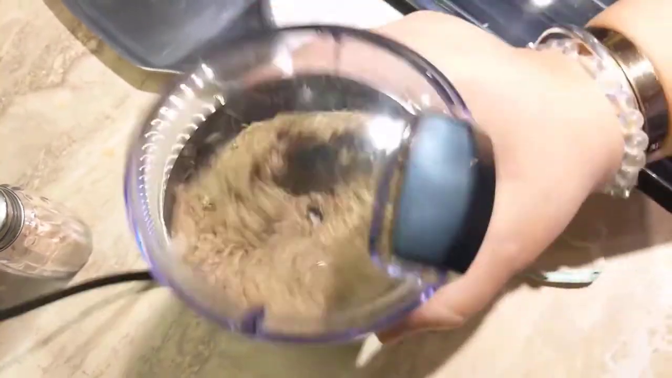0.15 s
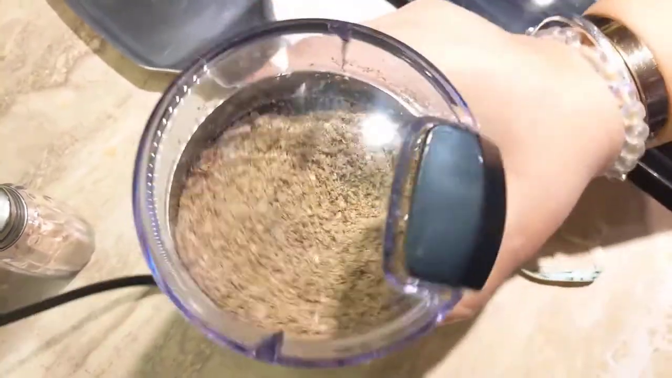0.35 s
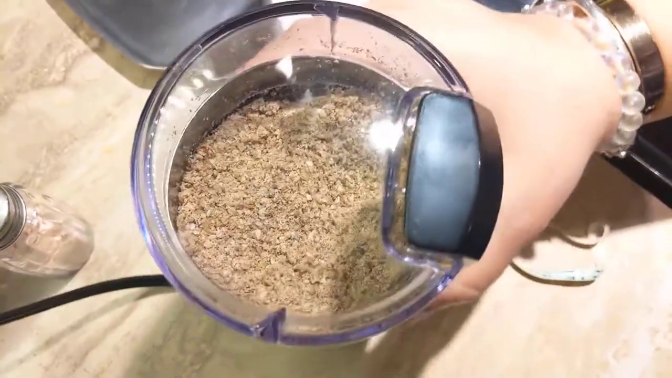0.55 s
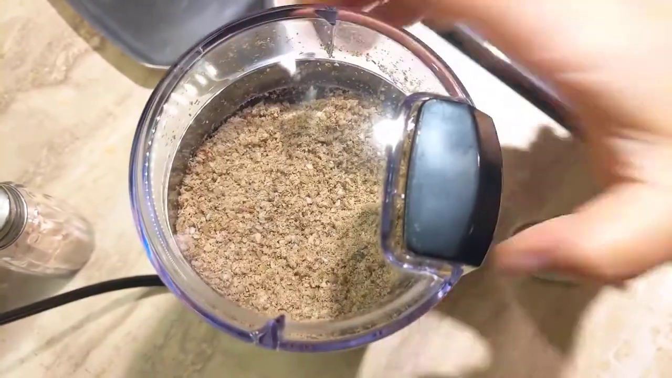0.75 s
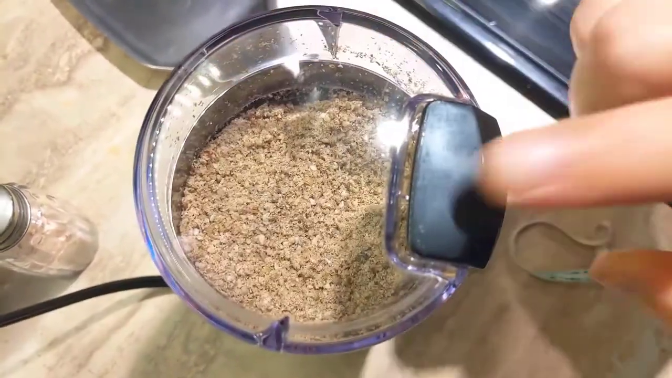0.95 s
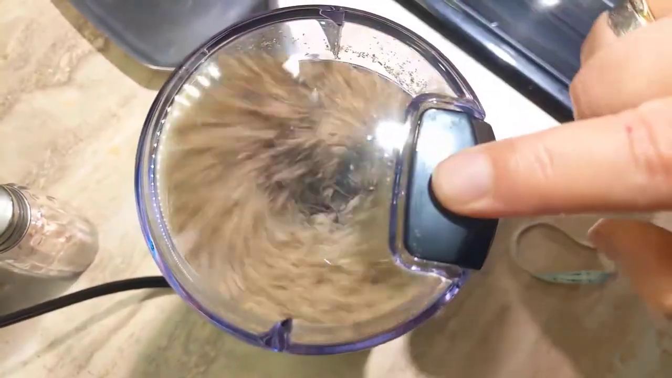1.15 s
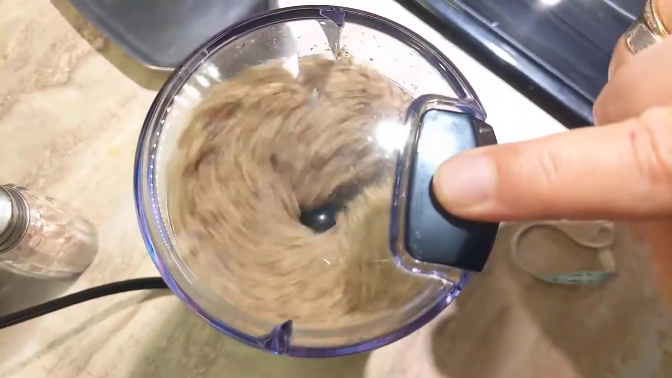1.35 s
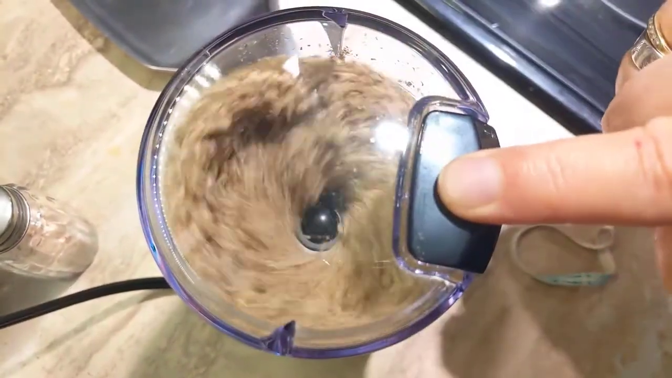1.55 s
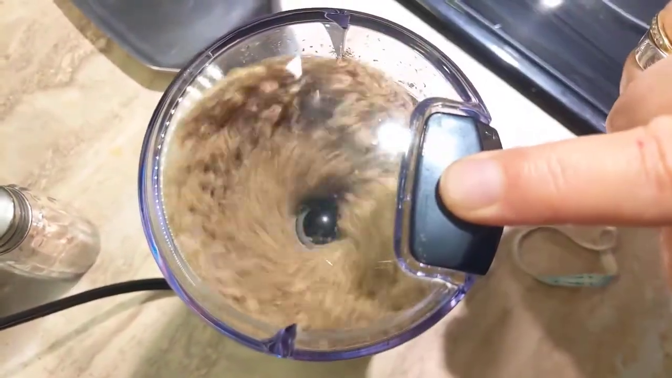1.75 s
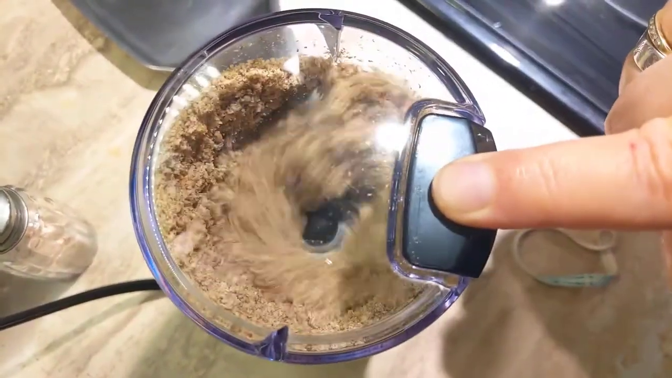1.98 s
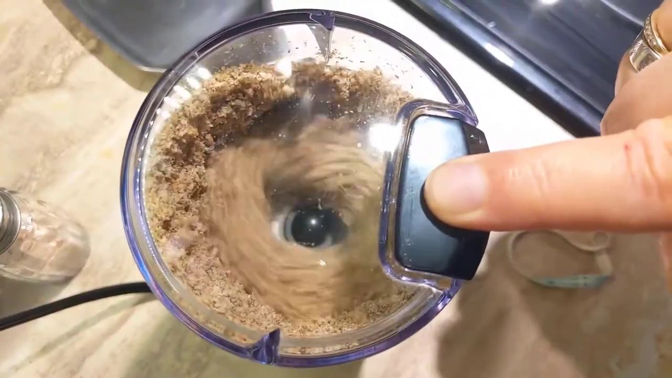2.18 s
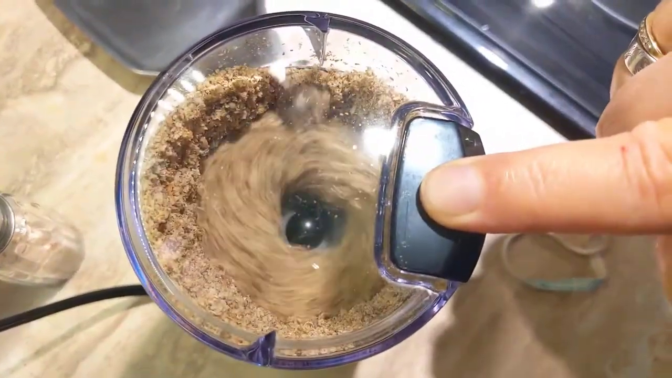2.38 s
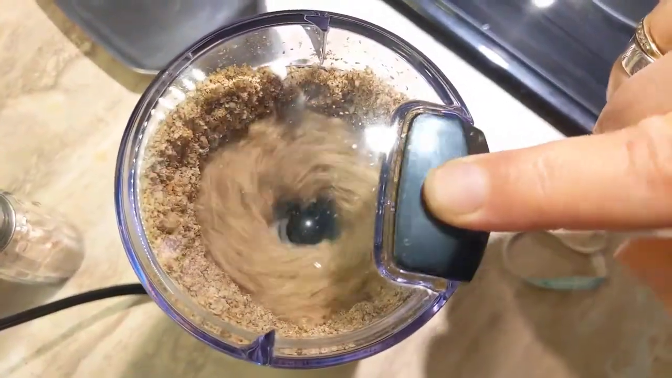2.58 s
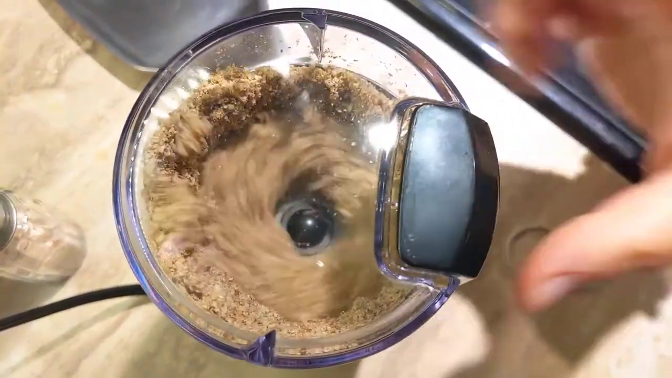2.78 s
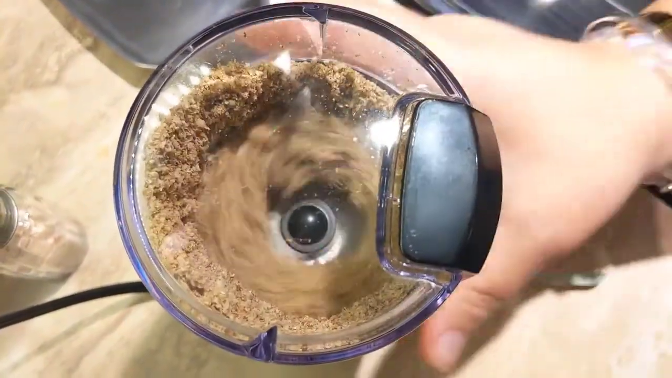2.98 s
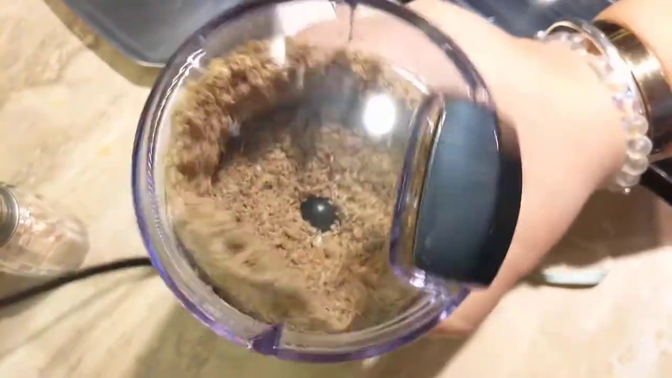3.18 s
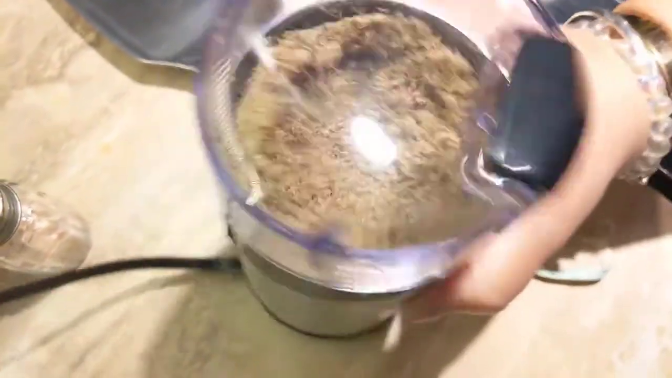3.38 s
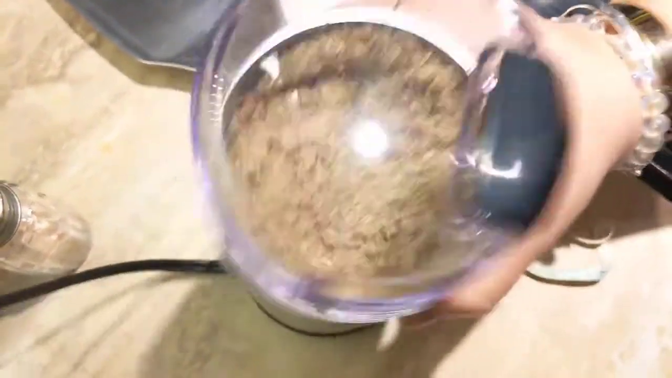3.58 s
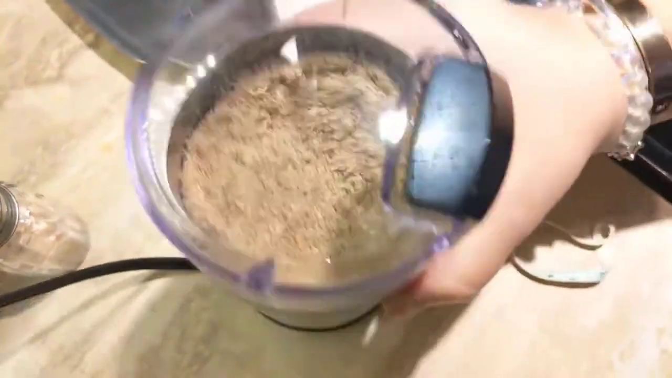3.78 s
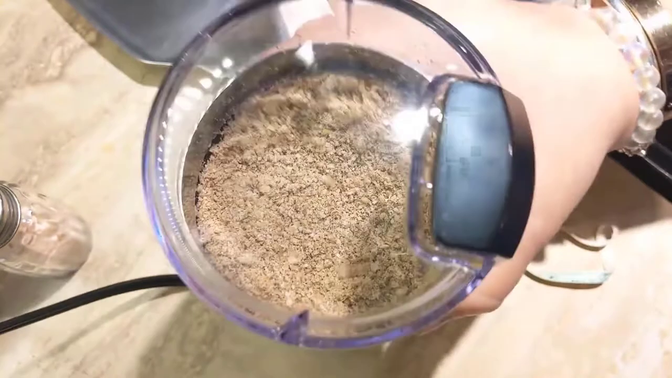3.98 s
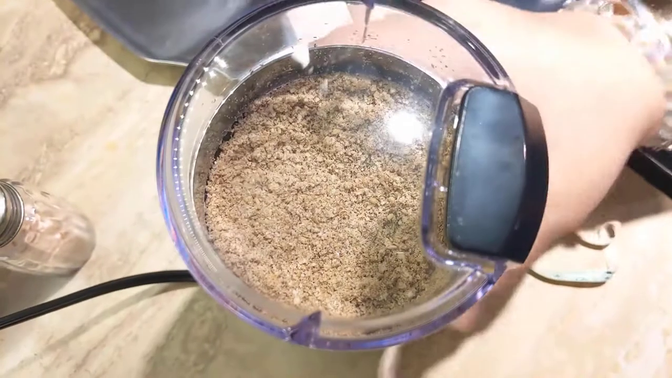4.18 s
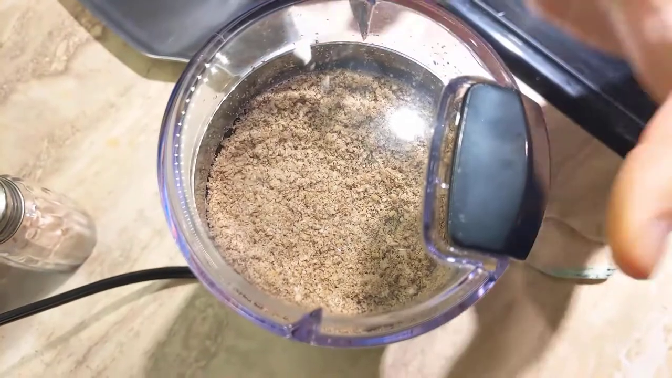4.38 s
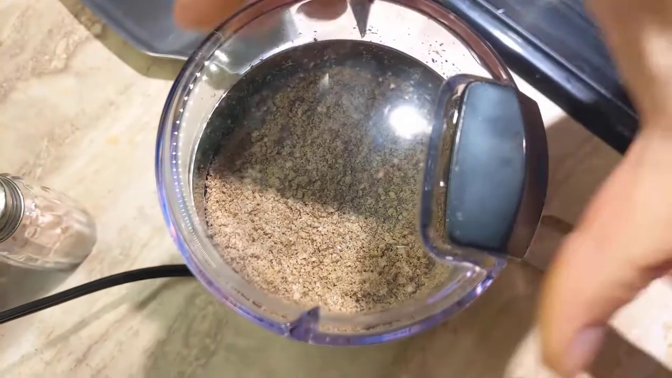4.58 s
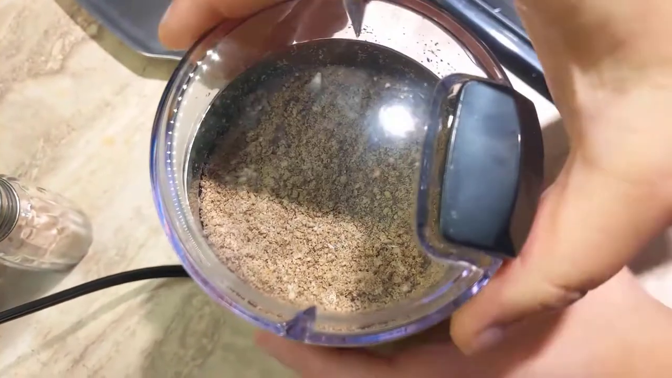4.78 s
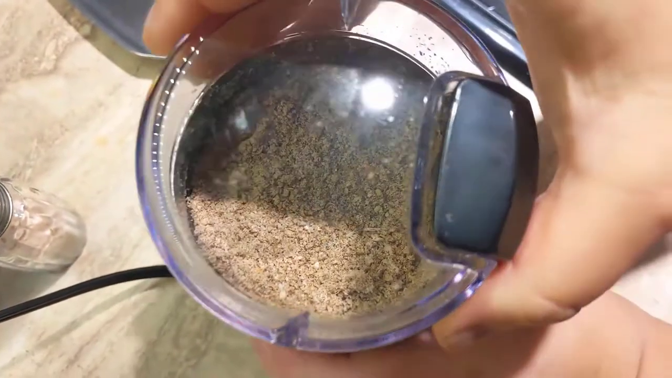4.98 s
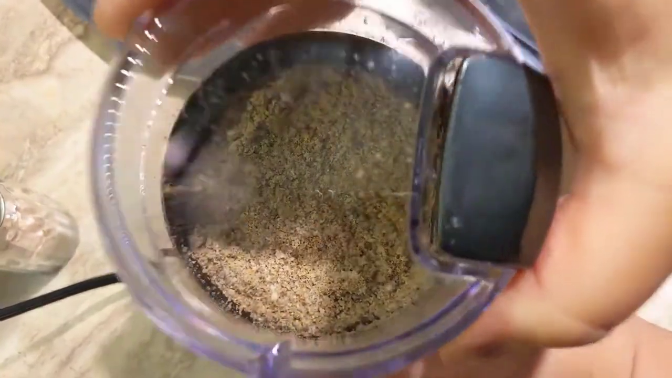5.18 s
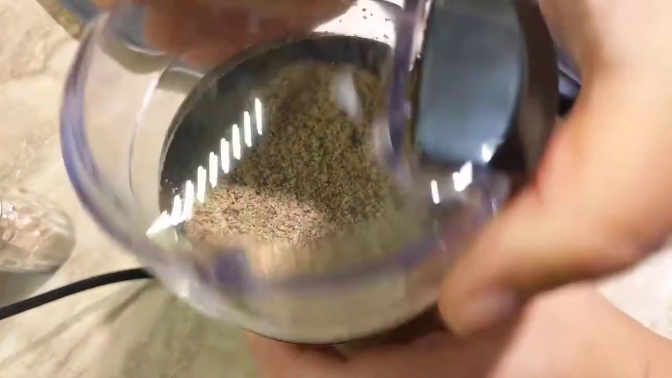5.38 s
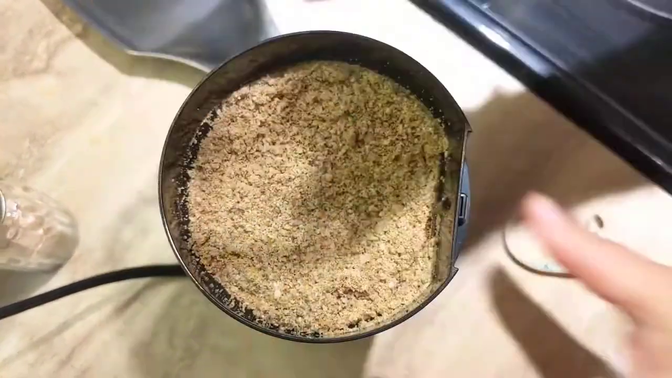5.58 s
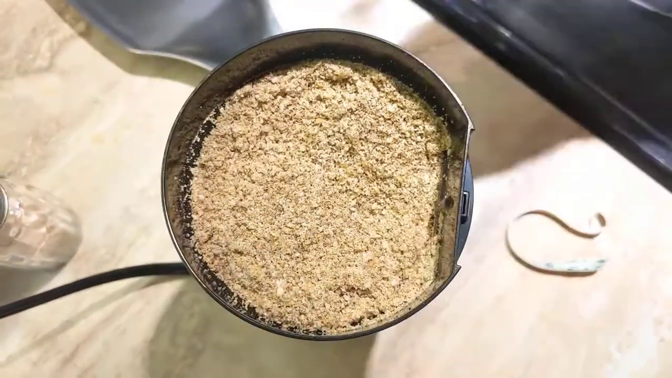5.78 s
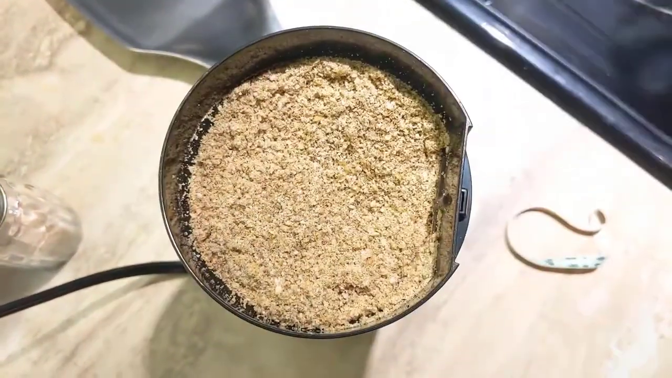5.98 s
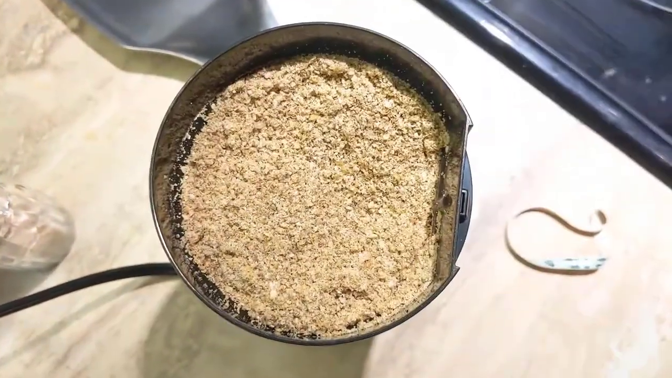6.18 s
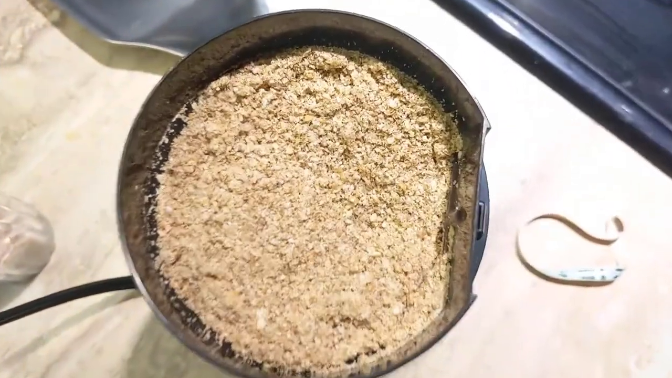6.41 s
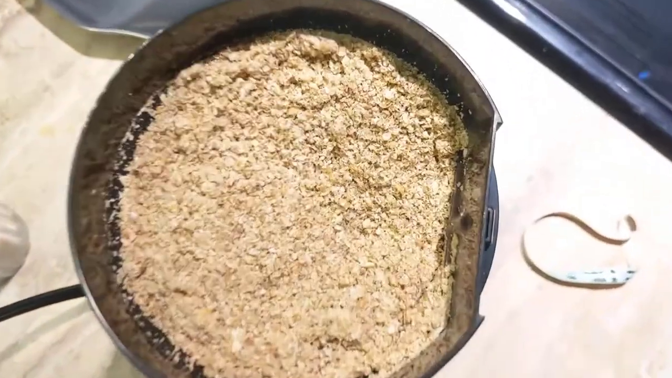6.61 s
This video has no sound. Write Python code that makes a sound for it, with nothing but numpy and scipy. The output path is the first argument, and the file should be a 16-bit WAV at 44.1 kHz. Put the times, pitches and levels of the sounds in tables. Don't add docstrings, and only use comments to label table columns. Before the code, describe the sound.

Seeds are shaken and set down with a knock, a small blade grinder whirs and coasts down, then plastic rattles and a lid squeaks off.

```python
import sys
import numpy as np
from scipy import signal
from scipy.fft import rfft, irfft, next_fast_len
from scipy.io import wavfile
from scipy.ndimage import uniform_filter1d

SR = 44100
rng = np.random.default_rng(int(sys.argv[2]) if len(sys.argv) > 2 else 0)


def undo_db(level):
    steps = np.asarray(level, float) / 20
    return 10 ** steps


def materialize(psi):
    bounded = np.clip(np.atleast_2d(psi).T, -1, 1)
    quanta = np.round(bounded * 32767).astype(np.int16)
    wavfile.write(sys.argv[1], SR, quanta)


N = 293265
T = np.arange(N) / SR


def evened(x):
    return x / np.sqrt(np.mean(x ** 2) + 1e-20)


def read(points, hz):
    f, value = np.transpose(points)
    return np.interp(np.log(hz + 1), np.log(f + 1), value)


def between(start, end):
    return np.clip(np.minimum(T - start, end - T) / 0.0033, 0, 1)


def columns(rows):
    s, *values = np.transpose(rows)
    return between(s[0], s[-1]), *(np.interp(T, s, v) for v in values)


def add(mix, s, sound):
    part = mix[round(s * SR):][:len(sound)]
    part += sound[:len(part)]


def colour(x, points):
    n = x.shape[-1]
    size = next_fast_len(n)
    gain = undo_db(read(points, np.fft.rfftfreq(size, 1 / SR)))
    return irfft(rfft(x, size) * gain, size)[..., :n]


def band(x, lo_hz, hi_hz):
    sos = signal.butter(2, [lo_hz, hi_hz], "bandpass", fs=SR, output="sos")
    return signal.sosfilt(sos, x)


def resonate(x, hz, width):
    turn = np.exp(2j * np.pi * np.cumsum(hz * np.ones(x.shape[-1])) / SR)
    r = np.exp(-np.pi * width / SR)
    return 2 * (turn * signal.lfilter([1 - r], [1, -r], x * turn.conj())).real


def wander(seconds):
    knots = rng.standard_normal(1400)
    return np.interp(T / seconds, np.arange(1400), knots)


def bell(s, width):
    return np.exp(-((T - s) / width) ** 2)


def stroke(start, length):
    out, u = np.zeros(N), np.arange(0, 1, 1 / (length * SR))
    add(out, start, abs(np.sin(np.pi * u ** 0.54)))
    return out


def strikes(per_s, spread_db, shared):
    hit = rng.random((N, 3)) < per_s / SR
    size = undo_db(spread_db * np.minimum(rng.exponential(1, (N, 3)), 4)) * rng.standard_normal((N, 3))
    both, left, right = (hit * size).T
    return np.sqrt(shared) * both + np.sqrt(1 - shared) * np.array([left, right])


# frequency in Hz, level in dB per Hz.
AIR_HISS = [(15, -46.5), (25, -4.5), (97, -3), (117, -10), (154, 14.5), (191, -27.5), (272, -7),
            (376, -8.5), (408, -11), (826, -17), (999, -19), (2190, -24), (10900, -35.5), (16300, -45)]
# frequency in Hz, left-right correlation from -1 to 1.
PORT_LIKENESS = [(60, 1), (180, 0.92), (550, 0.73), (1650, -0.48), (4970, -0.28), (15000, -0.23)]
# frequency in Hz, left over right in dB.
PORT_LEAN = [(60, -3.5), (130, 3.5), (290, -1), (640, 1.5), (1410, -1.5), (3100, -1), (6820, 1.5),
             (15000, -2)]


def air():
    frames, hz = N // 256 + 5, np.fft.rfftfreq(1024, 1 / SR)
    a, b, c, d, patches = rng.standard_normal((frames, 513, 5)).T
    patches = uniform_filter1d(uniform_filter1d(patches, size=10, axis=0), size=12, axis=1)
    patches_db = 1.5 * evened(patches)
    same = np.clip(read(PORT_LIKENESS, hz), -1, 1)[:, None]
    left = a + 1j * b
    z = np.array([left, same * left + np.sqrt(1 - same ** 2) * (c + 1j * d)])
    lean_db = np.outer([.5, -.5], read(PORT_LEAN, hz))[:, :, None]
    z *= undo_db(read(AIR_HISS, hz)[:, None] + patches_db + lean_db)
    noise = evened(signal.istft(z, nperseg=1024, noverlap=768)[1][:, :N])
    noise[1] += 1.9 * resonate(noise[1], 2150., 200.0)
    return undo_db(-63.1) * noise


# time in seconds, frequency in Hz.
RIM_PITCH = [(0, 5400), (.3, 5400), (3.0, 4400), (3.8, 4400), (3.85, 4000), (4.6, 4000), (4.8, 3550),
             (4.9, 4000), (6.65, 4000)]


def rim_hz(s):
    return np.interp(s, *np.transpose(RIM_PITCH))


# start in seconds, length in seconds, level in dB,
# rim ring in dB, bright part in dB.
RUBS = [(0, 0.25, -65.5, -19.5, -19), (0.224, 0.41, -63, -21.5, -27), (0.673, 0.1, -71, -12.5, -13),
        (1.147, 0.044, -45, -20.5, -25), (3.145, 0.4, -68, -23, -21.5), (3.244, .085, -70.5, -15, -7),
        (3.574, 0.35, -69.5, -16, -27), (3.712, 0.18, -49, -13.5, -27), (3.806, 0.47, -55.5, -23, -42),
        (4.175, 0.16, -66.5, -13, -8.5), (4.217, 0.78, -65.5, -13.5, -20.5), (4.852, 0.16, -75, -11, -6),
        (4.927, 0.25, -61.5, -9, -9.5), (5.119, 0.13, -58.5, -21, -5.5), (5.226, 0.12, -58, -8.5, -7.5),
        (5.485, 0.11, -71, -12, -3.5), (5.545, 0.95, -71.5, -8.5, -11)]


def rubbing():
    drive = strikes(2500, 2.5, .4) * undo_db(2.5 * wander(.01))
    mid = evened(band(drive, 1090, 3360)) + 0.48 * evened(resonate(drive, 2140.0, 200.))
    rim = evened(band(drive, 2590, 5540) + 0.5 * resonate(drive, rim_hz(T), 110.))
    bright = evened(band(drive, 3600, 13000))
    levels = np.zeros((3, N))
    for s, length, db, rim_db, bright_db in RUBS:
        parts_db = db + np.array([[-4.], [rim_db + 9.0], [bright_db + 8.0]])
        levels += undo_db(parts_db) * stroke(s, length)
    return levels[0] * mid + levels[1] * rim + levels[2] * bright


# time in seconds, peak in dB, dull part in dB,
# sharp part in dB, ring t60 in seconds.
KNOCKS = [(0.0635, -30.5, -18, -53, 0.035), (0.126, -57.5, 5.5, -2.5, 0.06), (0.135, -50, 4, -12, 0.052),
          (0.15, -50, -15, -29, 0.037), (0.24, -19, -18, -18.5, 0.072), (0.248, -12, -24.5, -54, 0.04),
          (0.2691, -21.5, -13.5, -24, 0.037), (0.508, -63, 5, -15, 0.06), (0.692, -38, -11, -30, 0.027),
          (0.743, -72.5, -4, 6, 0.058), (3.31, -52.5, 1.5, -11, 0.047), (3.402, -59.5, 2.5, -7.5, 0.044),
          (3.5489, -27.5, -6, -39, 0.0078), (3.5787, -24, -50, -14, 0.078), (3.7101, -21, -1, -26, 0.089),
          (3.718, -16.5, -10, -10.5, 0.099), (3.859, -18.5, -11.5, -12, 0.035),
          (3.872, -16, -14, -21, 0.029), (3.885, -48, 4, -19.5, 0.011), (3.927, -14.5, -23.5, -31.5, 0.044),
          (4.0277, -21, -15, -21, 0.037), (4.067, -20.5, -29, -45, 0.028), (4.0881, -16, -18, -24, 0.056),
          (6.523, -64, -3.5, -11.5, .036), (6.548, -78, 3.5, -17, .03)]
SWITCH = [
    (1.0679, -14, -15, -56, 0.0043),
    (1.1327, -15.5, -56, -54, 0.0049),
    (1.2037, -32, -6, -25, 0.17),
    (1.3179, -23, -35.5, -18, 0.05),
    (2.7604, -15, -28, -19, 0.046),
    (2.8044, -22.5, -21.5, -42, 0.42),
    (2.9344, -41, -27, -30, 0.042),
]
MORE_KNOCKS = [(3.5449, -43, -0.5, -24.5, 0.019), (3.9467, -46, -13, -6, 0.0226), (3.9839, -46, -5, -13, 0.06),
               (4.0162, -42.5, -2, -6.5, 0.11), (5.0183, -50, -25, -6, .02), (5.1241, -51, -23, -5, .02),
               (5.153, -54, -26, 0, .02), (5.2282, -42, -25, -22, 0.033), (5.2648, -37, -31, -22, .03),
               (5.3073, -50, -25, -2, 0.022)]
CREAKS = [(4.8154, -28, -24.5, -21.5, 0.031), (4.9629, -32, -45, -13.5, 0.045),
          (4.9824, -42.5, -28, -9, 0.031), (5.0402, -44.5, -16, -3, 0.031),
          (5.0688, -44.5, -12.5, -0.5, 0.042), (5.1675, -38.5, -21, -7, 0.067),
          (5.1847, -58, -8.5, 3, 0.11), (5.246, -38, -25.5, -19, 0.31), (5.272, -33.5, -28, -25, 0.26),
          (5.3, -34, -20.5, -16, 0.053)]
# time in seconds, frequency in Hz.
SHELL_PITCH = [(.06, 2500), (.24, 2180), (.7, 2080), (1.07, 2125), (1.14, 2120), (3.3, 2060), (3.547, 2300),
               (3.58, 2380), (3.71, 2190), (3.86, 2600), (3.872, 2380), (3.928, 2200), (4.02, 2200),
               (4.068, 2170), (4.089, 2410), (4.82, 2004), (4.96, 2200), (5.3, 2200)]


def ticks():
    out, t = np.zeros((2, N)), np.arange(6000) / SR
    rows = SWITCH + KNOCKS + CREAKS + MORE_KNOCKS
    for row, noise in zip(rows, rng.standard_normal((len(rows), 3, 6000))):
        s, db, dull_db, sharp_db, t60 = row
        noise = np.sqrt(.5) * (noise[0] + noise[1:])
        decay = undo_db(-60 * t / (0.5 * t60)) + 0.4 * undo_db(-60 * t / t60)
        crack = noise * decay * np.minimum(t / 0.00007, 1)
        blow = np.exp(-((t - .0018) / 0.0016) ** 2) * np.minimum(t / 0.00075, 1)
        hz = np.interp(s, *np.transpose(SHELL_PITCH))
        ping = blow * np.sin(2 * np.pi * hz * t) + 1.1 * band(crack, 0.77 * hz, 1.436 * hz)
        dull = band(crack, 600, 2100) + 0.98 * band(crack, 300, 600)
        rim = band(crack, 2800, 5200) + 3. * resonate(crack, rim_hz(s), 130.)
        bright = band(band(crack, 2900, 12000), 2000, 12500)
        parts = [(ping, -7.), (dull, dull_db + 10.5), (rim, sharp_db + 7.0), (bright, 1.94 * sharp_db + 13.0)]
        tick = sum(undo_db(db + part_db) * part / abs(part).max() for part, part_db in parts)
        add(out.T, s, tick.T)
    return out


# time in seconds, peak in dB, slab frequency in Hz, t60 in seconds, # knock
# of the slab's higher modes in dB.
BUMPS = [(0.126, -31, 96, 0.071, -39.5), (0.179, -53, 93, 0.1, -29.5), (0.24, -31, 105, 0.066, -25),
         (0.247, -29.5, 91, 0.073, -9), (0.375, -39, 96, 0.074, -23), (0.495, -36.5, 92, 0.085, -19),
         (0.528, -58, 71, 0.088, -26), (0.688, -45, 73.4, 0.075, -5.5), (1.068, -44, 143, 0.036, -10),
         (1.206, -41.5, 120, 0.099, -14), (3.5463, -28, 91, 0.077, -14), (3.576, -45, 74, 0.2, -11.5),
         (3.711, -9, 130, 0.034, 0), (3.786, -43, 100, .06, 8), (3.858, -23, 100, 0.093, -13),
         (3.929, -53, 99, 0.4, 1.5), (4.014, -18, 89, 0.062, -16.5), (4.084, -33.5, 102, 0.11, -12),
         (4.18, -40.5, 95, 0.057, -34), (6.522, -39.5, 115.5, 0.026, -8.5)]


def bumps():
    out, t = np.zeros(N), np.arange(12000) / SR
    for s, db, hz, t60, knock_db in BUMPS:
        slab = np.sin(2 * np.pi * hz * t) + 0.4 * np.sin(2 * np.pi * 176 * t)
        slab = slab * np.minimum(t / 0.0085, 1)
        knock = np.sin(2 * np.pi * 400 * t) + 0.53 * np.sin(2 * np.pi * 610 * t)
        knock = undo_db(knock_db - 7.5) * knock * np.minimum(t / 0.0014, 1)
        add(out, s, undo_db(db + 6.0 - 60 * t / t60) * (slab + knock))
    return out


def shudder():
    level = np.zeros(N)
    for s, db, *_ in BUMPS:
        add(level, s, undo_db(db - 7 - 60 * T[:SR // 2] / 0.33))
    return undo_db(-11.5) * level * evened(band(rng.standard_normal(N), 60, 190))


# time in seconds, blow in dB.
DISH_BLOWS = [
    (.25, -35),
    (3.58, -69),
    (3.712, -59),
    (3.87, -37),
    (4.09, -44.5),
    (4.82, -52),
]
# frequency in Hz, level in dB, t60 in seconds.
DISH_MODES = [(2090, -20.5, 1), (2210, -2, 1.12), (2320, -9.5, 0.47), (2380, -2.5, 0.5)]


def dish():
    out, t = np.zeros(N), np.arange(SR) / SR
    ring = sum(undo_db(db - 60 * t / t60) * np.sin(2 * np.pi * hz * t) for hz, db, t60 in DISH_MODES)
    for s, db in DISH_BLOWS:
        add(out, s, undo_db(db - 18.5) * ring)
    return out


# start in seconds, length in seconds, rumble in dB.
LIFTS = [
    (0.5, 0.16, -44.5),
    (3.209, 0.31, -39.5),
]


def dragging():
    level = sum(stroke(s, length) * undo_db(db) for s, length, db in LIFTS)
    return undo_db(-11.5) * level * evened(band(rng.standard_normal(N), 22, 73))


ON_S, LET_GO_S, OFF_S, STOP_S = 1.19, 2.675, 2.77, 3.03
FULL_HZ = 288.3
CLEAR_S = 1.55
# time in seconds, width in seconds, change of the tones in dB, sag in Hz.
CLUMPS = [
    (1.22, .07, -2., 80.),
    (1.45, .1, 0., 13.),
    (2.07, .045, -11., 2.),
    (2.52, .085, -13., 0.),
]


def shaft():
    lag_hz, spin_up_s, fine_s, creep_hz_per_s, coast_hz_per_s = 130., .14, 2.2, 23., 570
    t = np.minimum(T, LET_GO_S)
    hz = FULL_HZ - lag_hz * np.exp(-np.maximum(t - ON_S, 0) / spin_up_s)
    hz = hz + creep_hz_per_s * np.maximum(t - fine_s, 0)
    damp_db = 0
    for s, width, db, sag_hz in CLUMPS:
        fall = bell(s, width)
        hz, damp_db = hz - sag_hz * fall, damp_db + db * fall
    return np.maximum(hz - coast_hz_per_s * (T - t), 70.), damp_db


# time in seconds, level in dB.
WHIRL = [(1.185, -48.5), (1.215, -31.5), (1.24, -25.5), (1.272, -30.5), (1.285, -32), (1.31, -30.5),
         (1.325, -27), (1.55, -28), (1.585, -25.5), (1.63, -28.5), (2.36, -27.5), (2.94, -31.5),
         (3.06, -39.5), (3.13, -51), (3.2, -64.5), (3.26, -66)]
# frequency in Hz, level in dB.
BOWL_COLOUR = [(80, -49), (400, -42), (800, -9), (1150, -1.5), (1500, 5.5), (2000, 4.5), (2600, 12),
               (3100, -1), (4200, -18)]
# frequency in Hz, level in dB.
GRIT_COLOUR = [(2500, -26), (4000, 17.5), (5400, -8.5), (7200, -21), (8700, 8), (11000, 0), (15000, -14),
               (16400, -30.5)]
# frequency in Hz, width in Hz, level in dB.
BOWL_RINGS = [(1750, 69, -17), (2067, 54, 1), (2402, 64, -1), (2200, 300, -11), (3570, 150, -10.5)]
# frequency in Hz, width in Hz, level in dB.
BLADE_RINGS = [(5220, 330, 16.5), (8300, 150, 1.5), (11200, 200, 5.5)]
# time in seconds, frequency in Hz, level in dB.
LID_GLIDES = [
    [(1.3, 2500, -42), (1.5, 2640, -35), (1.58, 2620, -35), (1.66, 2600, -39), (2.1, 2615, -35),
     (2.72, 2598, -38), (2.85, 2720, -34), (2.97, 2770, -26), (3.01, 2810, -36), (3.08, 2890, -58)],
    [(2.77, 3110, -64), (2.83, 3095, -43), (2.92, 3020, -41), (2.97, 2990, -41), (3.08, 2930, -53)],
    [(1.21, 2300, -46), (1.24, 2500, -34), (1.265, 2780, -33), (1.29, 2800, -46)],
    [(1.295, 2120, -42), (1.32, 2200, -33), (1.35, 2380, -33), (1.42, 2440, -32), (1.47, 2450, -44)],
    [(1.2, 1150, -44), (1.22, 1250, -38), (1.27, 1500, -38), (1.3, 1500, -50)],
    [(2.78, 2350, -46), (2.82, 2370, -31), (2.85, 2380, -37), (2.9, 2400, -46)],
    [(2.95, 2080, -46), (3.0, 2120, -44), (3.07, 2090, -43), (3.1, 2060, -54)],
    [(2.86, 1500, -50), (2.94, 1520, -41), (3.04, 1490, -45), (3.1, 1480, -56)],
]


def seeds():
    gate, level_db = columns(WHIRL)
    level_db = level_db + 0.16 * wander(0.046)
    decades = np.log10(shaft()[0] / FULL_HZ)
    grit_db = level_db - 16.5 + 25 * decades - 2 * (T - 2) + 1.6 * wander(.04)
    hollow_db = level_db - 10 - 25 * np.maximum(decades, -.3) * (T > CLEAR_S)
    hollow_db = hollow_db - 2.7 * (T < 1.32) + 3.5 * wander(.04)
    drive = evened(strikes(14000, 2., .3) * undo_db(1.5 * wander(.012) + .6 * wander(.05)))
    rings = sum(undo_db(db + 1.5 + wander(0.037)) * resonate(drive, hz, width) for hz, width, db in BOWL_RINGS)
    lean = undo_db([[-1], [0.71]])
    body = undo_db(-9.0) * evened(colour(drive, BOWL_COLOUR))
    hollow = resonate(drive, 1463.0, 49.0)
    hollow = hollow + .5 * resonate(resonate(drive, 1510.0, 330.0), 1510.0, 330.0)
    hollow = hollow + (0.057 + 0.05 * (T > OFF_S)) * band(drive, 270, 1500)
    grit = evened(colour(drive, GRIT_COLOUR))
    for hz, width, db in BLADE_RINGS:
        grit = grit + undo_db(db + 3.3 * wander(0.051)) * resonate(drive, hz, width)
    out = undo_db(level_db) * (body + lean * rings)
    out = gate * (out + undo_db(hollow_db - 4.5) * evened(hollow) + undo_db(grit_db - 2.5) * evened(grit))
    for rows in LID_GLIDES:
        gate, hz, db = columns(rows)
        on = gate > 0
        ring = resonate(resonate(drive[:, on], hz[on], 55.), hz[on], 70.)
        out[:, on] += lean * (gate * undo_db(db - 11.0))[on] * evened(ring)
    return out


# multiple of the shaft, level in dB, gain in dB per second,
# share of the clumps' damping, wavering in dB, change in dB while meal heaps on the wall.
LOW_ORDERS = [(1, -49, 9.5, 0.45, 2, -10), (2, -54.5, 2.5, 0.44, 6, -12), (3, -52, 0, 0.92, 3, -3.5),
              (4, -46.5, -0.5, 1.6, -1, -2.5)]
# multiple of the shaft, offset by mains throb in Hz, level in dB,
# gain in dB per second as the meal gets finer.
WHINE = [(5, 0, -53, -3.), (6, 0, -55, 6.), (7, 0, -52, 6.5), (8, 0, -52, 4.3), (8, 120, -46, 0.5),
         (9, -120, -49, -2.2), (9, 0, -44, -0.6), (10, -120, -38, -7.), (10, 0, -47, -2.),
         (11, 0, -62, 3.8), (11, 33, -60, 0.), (30, 0, -63, 3.), (40, 0, -69, 5.)]
# time in seconds, width in seconds, change in dB.
COAST_GAPS = [
    (2.75, .018, -18),
    (2.826, .012, -12),
    (2.87, .018, -12),
    (2.98, .04, -10),
]


def motor():
    hz, damp_db = shaft()
    gate, power = between(ON_S, STOP_S), between(ON_S, OFF_S)
    age, decades = np.minimum(T, LET_GO_S) - 2, np.log10(hz / FULL_HZ)
    turn = 2 * np.pi * np.cumsum(hz * (1 + 0.0019 * wander(0.022))) / SR
    buried_db = -14 * np.clip((CLEAR_S - T) / .06, 0, 1)
    gaps_db = sum(db * bell(s, width) for s, width, db in COAST_GAPS)
    coast_db = np.clip((T - LET_GO_S + 0.015) / 0.025, 0, 1) * (-10 + 22 * decades + gaps_db)
    heap = bell(1.98, .22)
    orders = []
    for k, db, slope_db, share, waver_db, heap_db in LOW_ORDERS:
        level_db = db - 0.5 + slope_db * age + share * damp_db + heap_db * heap + waver_db * wander(0.076)
        orders.append(undo_db(level_db + buried_db + coast_db) * np.sin(k * turn))
    first, *others = orders
    hum_hz, kick_s, kick_width_s = 120., 1.285, .03
    throb = np.cos(2 * np.pi * hum_hz * T)
    out = sum(others) * (1 + 0.24 * throb) * (power + (gate - power) * undo_db(-6))
    first = first * undo_db(9 * bell(kick_s, kick_width_s) - .3 * buried_db) * (1 + .1 * throb)
    for k, off_hz, db, slope_db in WHINE:
        level_db = db + 64.0 * decades + slope_db * age + 1.9 * wander(0.1) + 2 * coast_db + 0.28 * buried_db
        out += power * undo_db(level_db) * np.sin(k * turn + 2 * np.pi * off_hz * T)
    hum_db = -59 + 6 * np.exp(-np.maximum(T - ON_S, 0) / .05) + 0.76 * wander(.15)
    hum_db = hum_db - 5 * bell(kick_s - .02, kick_width_s) - 30 * np.maximum(T - LET_GO_S, 0)
    hum = power * undo_db(hum_db) * np.sin(2 * np.pi * hum_hz * T)
    return np.sqrt(2) * (gate * first + out + hum)


# time in seconds, blow in dB, rattle t60 in seconds.
CUP_BLOWS = [
    (3.5783, -29.5, 0.037),
    (3.7104, -25, 0.13),
    (3.72, -27, 0.093),
    (3.744, -33, 0.071),
    (3.764, -50, .1),
    (3.83, -57, .06),
    (3.945, -55.5, .07),
    (3.985, -67, 0.069),
    (4.03, -50, 0.053),
]
# frequency in Hz, level in dB, width in Hz.
CUP_MODES = [(1597, -4, 76), (2380, -10.5, 41.6), (4320, 0, 45), (6580, -13.5, 98), (6770, -7, 110),
             (8170, -12.5, 22), (9960, -4.5, 31), (11200, -20.5, 34), (11400, -16, 36), (13000, -12.5, 35),
             (14660, -12.5, 40)]


def cup():
    out, t = np.zeros((2, N)), np.arange(12000) / SR
    for (s, db, t60), noise in zip(CUP_BLOWS, rng.standard_normal((len(CUP_BLOWS), 2, 12000))):
        rattle = noise * (undo_db(-60 * t / t60) + .08 * undo_db(-60 * t / .45))
        ring = sum(undo_db(mode_db) * resonate(rattle, hz, width) for hz, mode_db, width in CUP_MODES)
        add(out.T, s, undo_db(db) * ring.T / abs(ring).max())
    return out


# start in seconds, length in seconds, level in dB.
SQUEAKS = [(4.815, 0.0058, -45), (5.066, 0.016, -41), (4.948, 0.013, -63), (5.035, .014, -59),
           (5.164, 0.02, -54), (5.183, 0.017, -56), (5.205, 0.036, -58), (5.235, 0.026, -53.5)]


def squeaks():
    sing = evened(resonate(rng.standard_normal(N), rim_hz(T), 81.0))
    return sing * sum(undo_db(db) * stroke(s, length) for s, length, db in SQUEAKS)


# frequency in Hz, t60 in seconds.
KITCHEN_DECAY = [(100, 0.12), (1000, 0.19), (2500, 0.069), (8000, 0.12)]


def kitchen(x):
    taps = np.zeros((2, SR // 2))
    at = np.arange(100, SR // 2 - 20, 20) + rng.integers(0, 20, (2, (SR // 2 - 101) // 20))
    np.put_along_axis(taps, at, rng.choice([-1., 1.], at.shape), 1)
    hz, t, z = signal.stft(taps, SR, nperseg=256)
    tail = signal.istft(z * undo_db(-60 * t / read(KITCHEN_DECAY, hz)[:, None]), SR, nperseg=256)[1]
    return signal.fftconvolve(x, tail / np.linalg.norm(tail[0]), axes=1)[:, :N]


def ports(x):
    left, right = x
    wide = undo_db(9.0) * resonate(resonate(right, 2530.0, 1800.0), 2434.0, 1600.0)
    narrow = undo_db(9.5) * resonate(resonate(right, 2504.0, 400.), 2026.0, 600.0)
    notch = 2.0 * resonate(resonate(right, 7700., 2900.0), 7700., 2900.0)
    treble = 0.62 * band(right, 10000.0, 14000.0) + 0.09 * band(right, 3600.0, 16000.)
    late = np.roll(right + wide + narrow - notch + treble, shift=6)
    return np.array([left * undo_db(2.2), late * undo_db(-2.2)])


def scene():
    near = rubbing() + ticks() + shudder() + dish() + dragging() + seeds() + motor() + cup() + squeaks()
    return ports(near + undo_db(-9.0) * kitchen(near) + bumps()) + air()


def band_limit(x):
    return signal.sosfilt(signal.butter(12, 16470, fs=SR, output="sos"), x)


def record(dry):
    ceiling = .62
    limited = ceiling * np.tanh(dry / ceiling)
    edge = signal.firwin(511, 15600., fs=SR)[None]
    finished = signal.oaconvolve(limited, edge, "same", axes=1)
    return band_limit(finished)


dry = scene()
out = record(dry)
materialize(out)
```